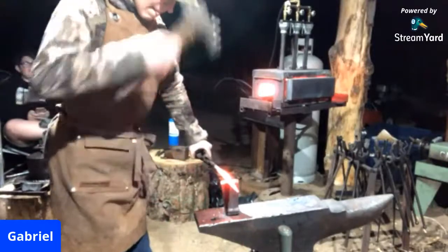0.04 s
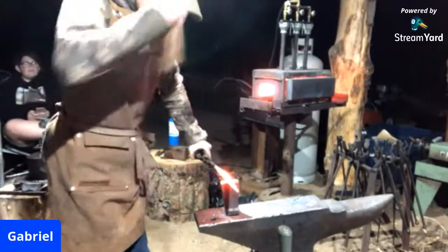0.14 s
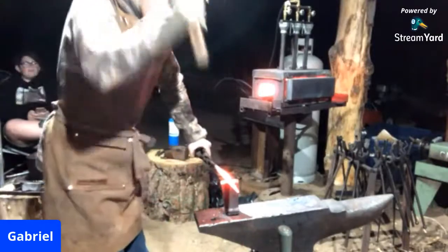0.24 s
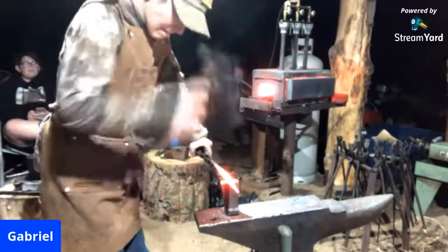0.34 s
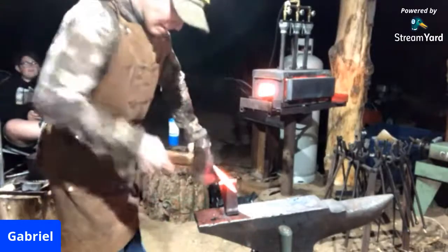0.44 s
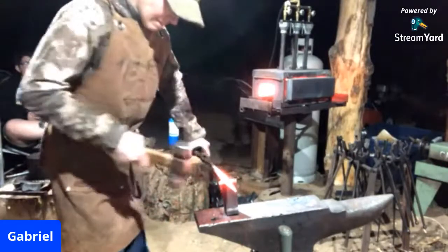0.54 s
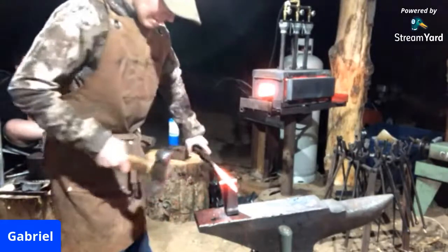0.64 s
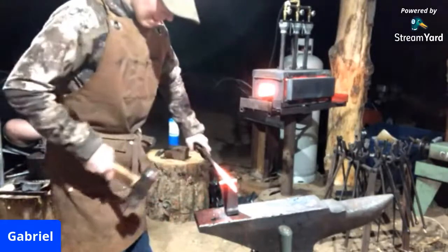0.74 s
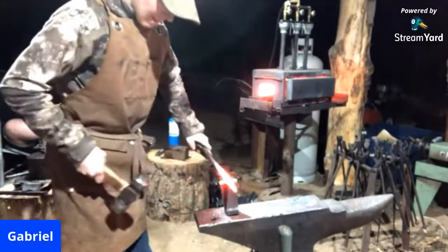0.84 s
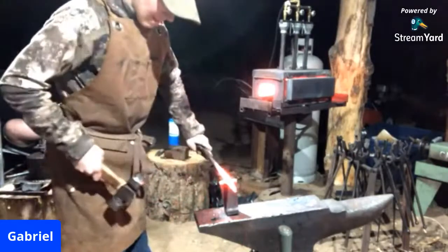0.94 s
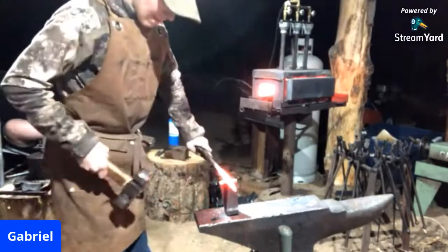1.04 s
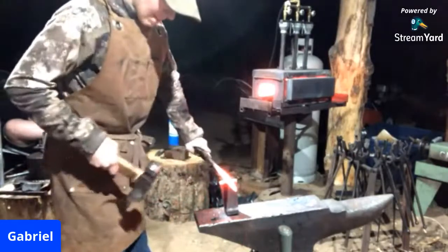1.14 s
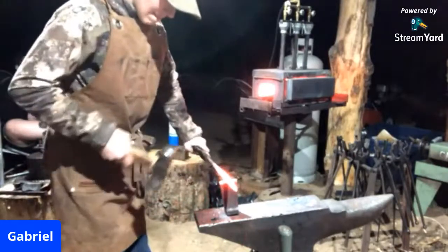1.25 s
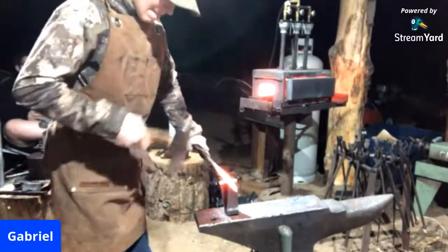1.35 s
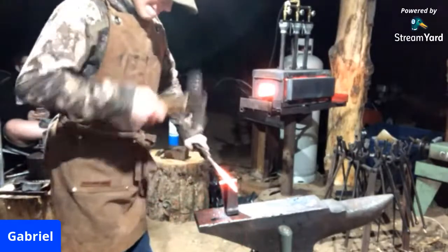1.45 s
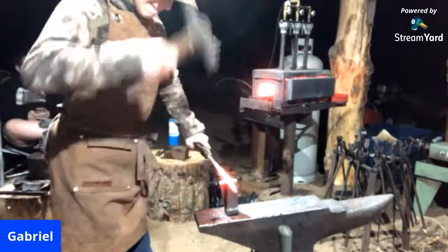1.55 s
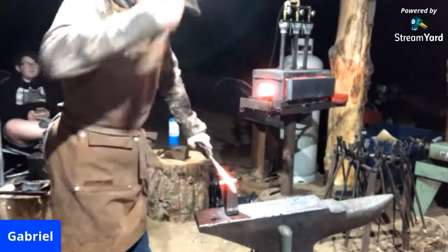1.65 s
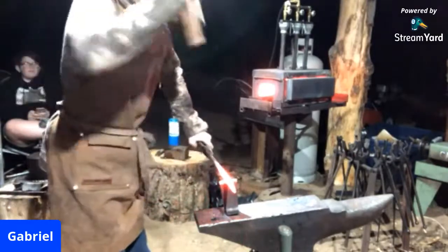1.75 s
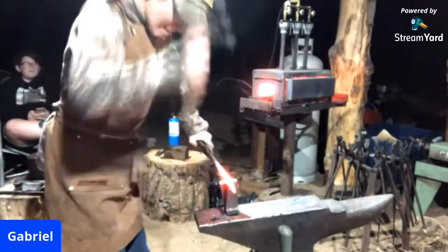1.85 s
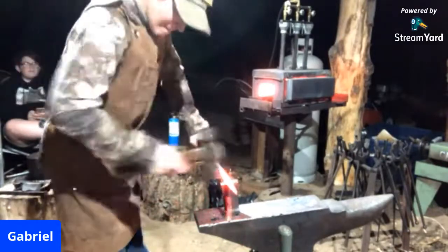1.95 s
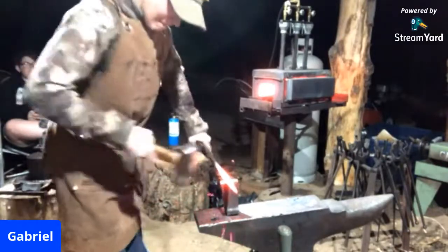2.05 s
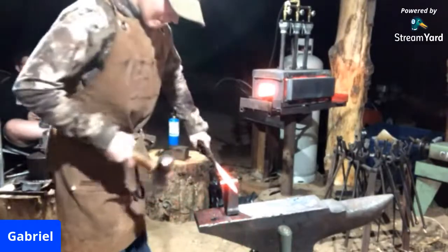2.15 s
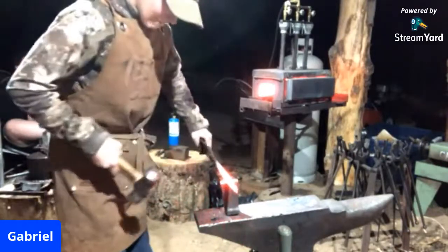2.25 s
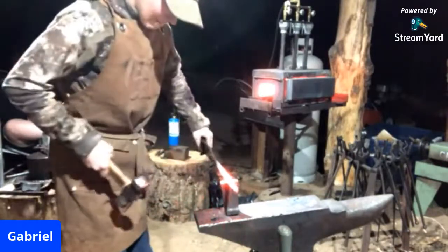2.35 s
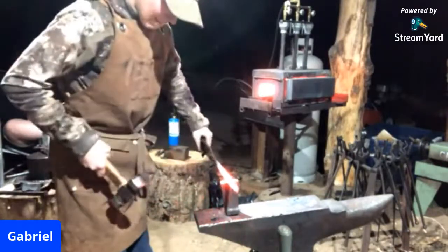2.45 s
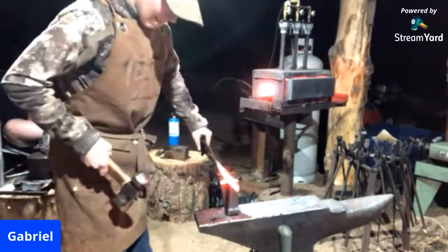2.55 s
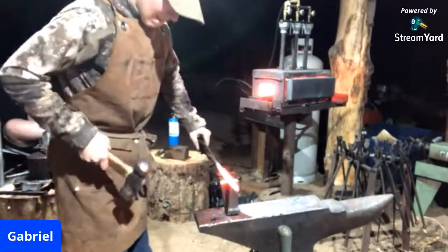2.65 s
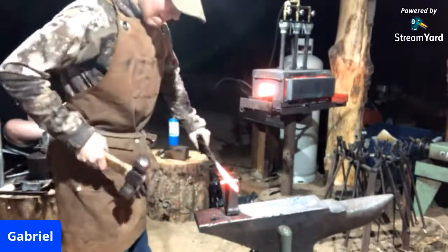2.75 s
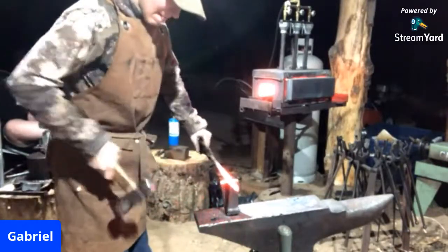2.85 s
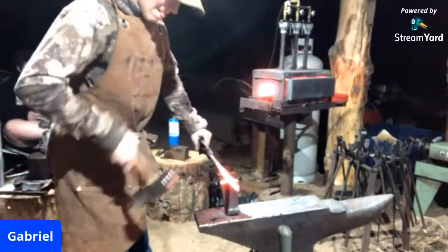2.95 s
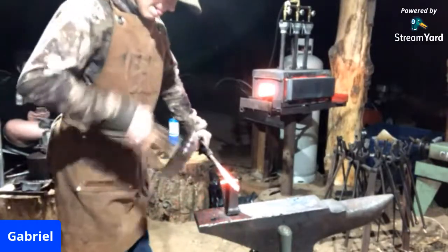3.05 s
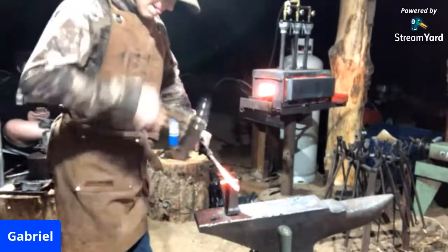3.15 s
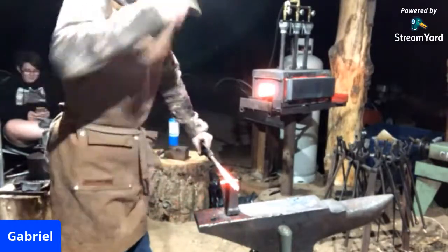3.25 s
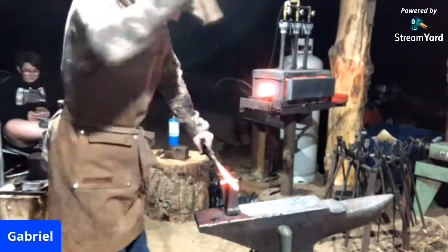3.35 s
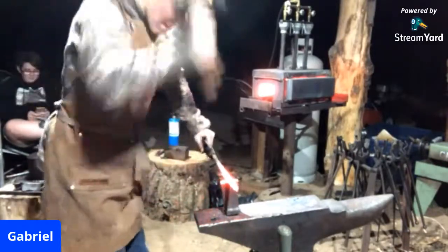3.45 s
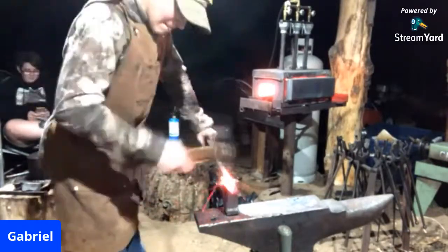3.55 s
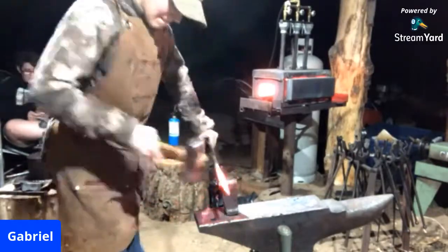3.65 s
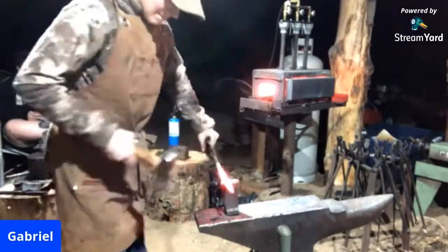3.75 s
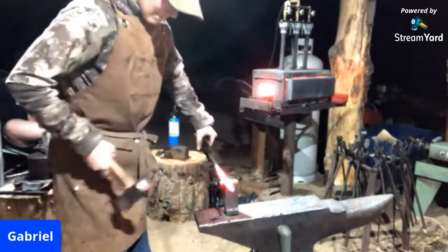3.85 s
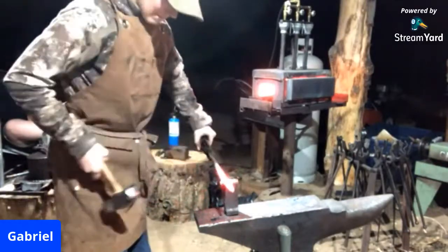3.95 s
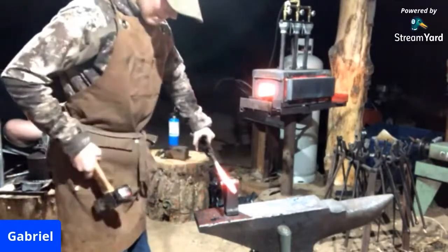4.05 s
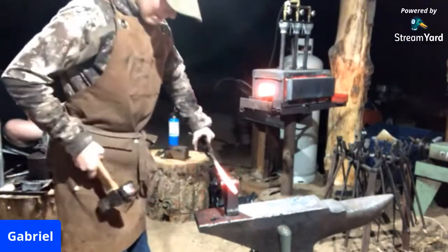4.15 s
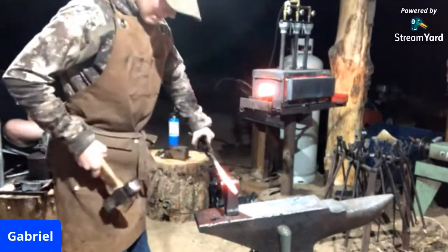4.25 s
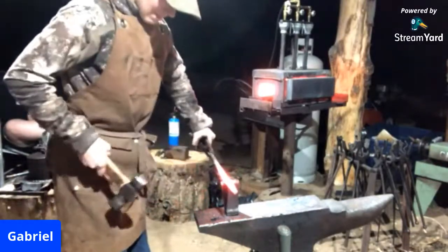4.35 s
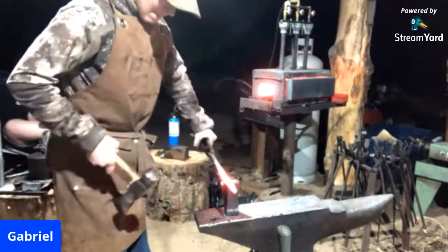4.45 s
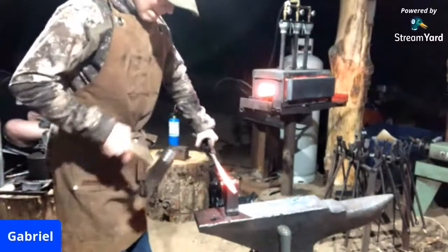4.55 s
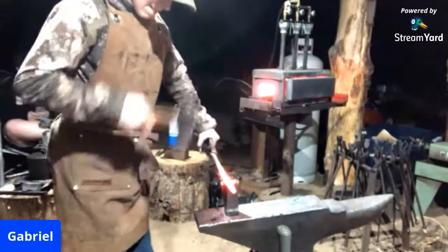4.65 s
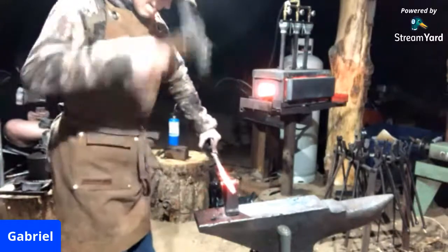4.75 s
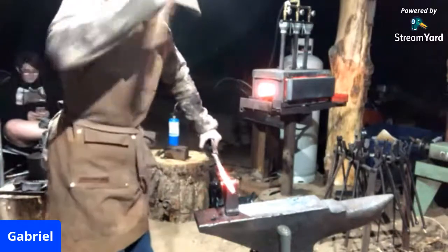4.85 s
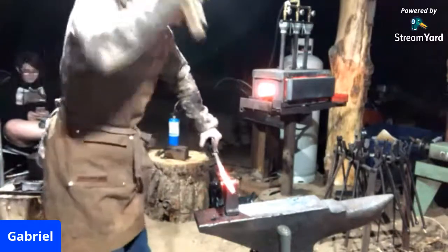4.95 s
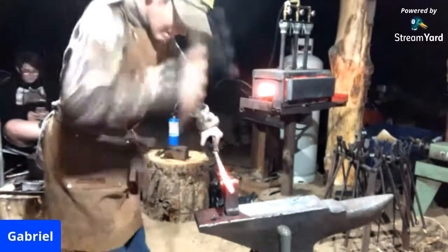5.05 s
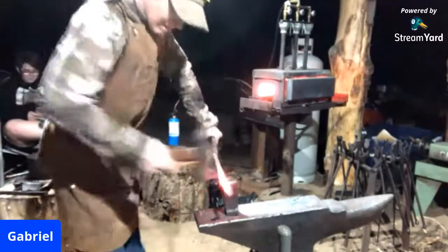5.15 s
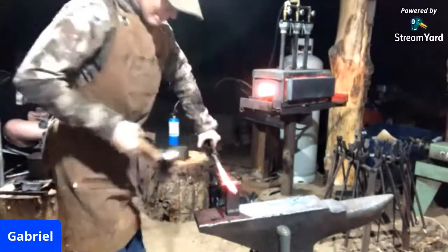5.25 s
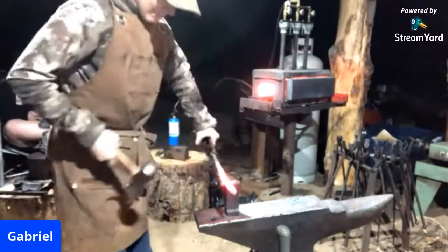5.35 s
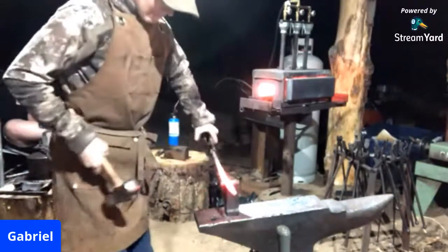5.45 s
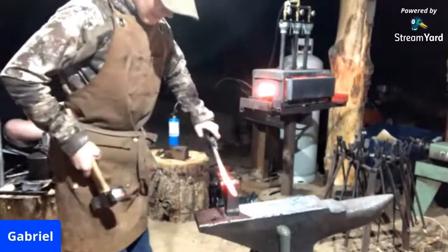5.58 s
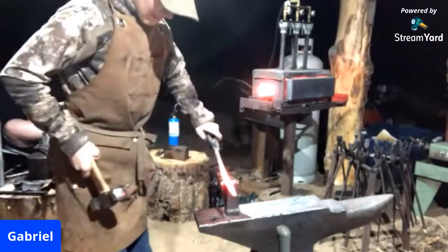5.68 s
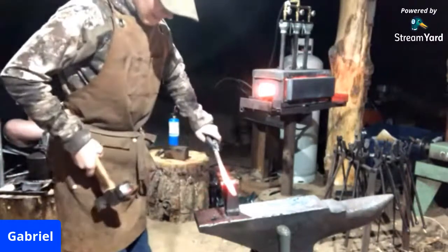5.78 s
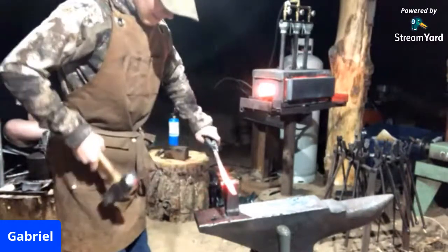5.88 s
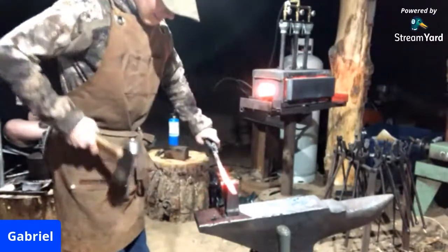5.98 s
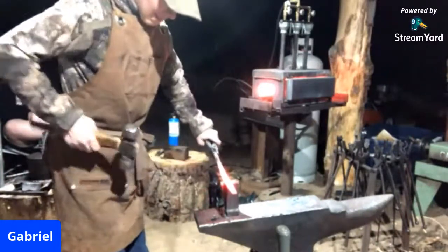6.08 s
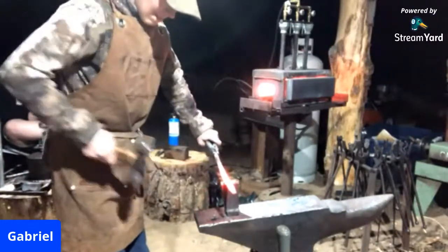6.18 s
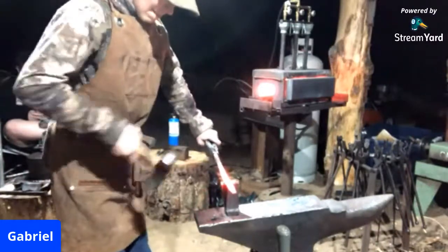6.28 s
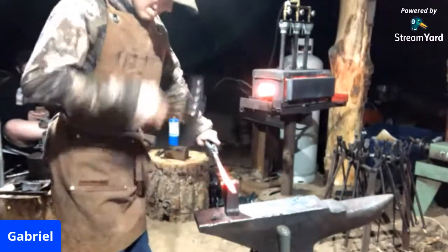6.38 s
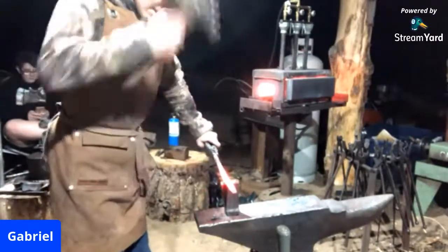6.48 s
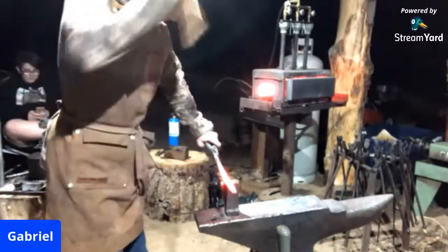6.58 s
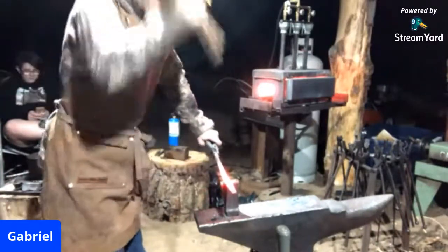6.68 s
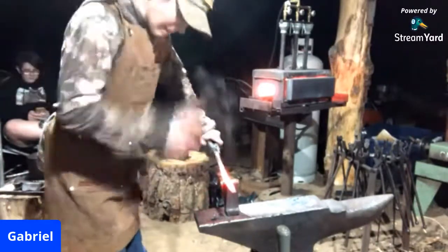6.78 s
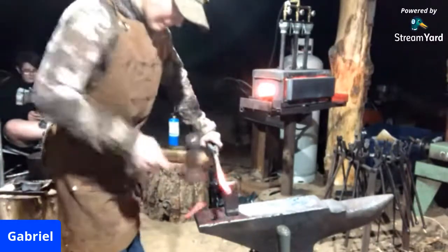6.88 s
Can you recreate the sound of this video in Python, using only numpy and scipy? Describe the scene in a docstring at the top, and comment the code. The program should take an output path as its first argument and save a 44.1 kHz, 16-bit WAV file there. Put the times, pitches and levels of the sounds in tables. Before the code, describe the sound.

In a shed, a gas forge gives a low, hollow roar while a nearby hammer lands five steady, heavy blows on steel held on an anvil. Each hit knocks, clatters off the walls and rings briefly, the last two ringing more brightly. It is heard through a call microphone, so the tails die abruptly, the roar dulls after each hit, and midway the sound briefly buzzes and drops out.

```python
"""Hammering at the forge

In a shed, the microphone hears a hand hammer upset glowing steel on an anvil beside a roaring gas forge.
Each blow thuds through anvil and stump, rings the steel and scatters a bright clatter off the shed.
It all comes over a streamed call: tails are cut short, the roar's treble ducks after each blow,
and the stream stalls once."""
import sys
import numpy as np
from scipy import signal
from scipy.fft import rfft, irfft
from scipy.io import wavfile
from scipy.ndimage import uniform_filter1d

SR = 44100
rng = np.random.default_rng(int(sys.argv[2]) if len(sys.argv) > 2 else 0)


def put_to_file(sound):
    """Save the sound as 16-bit audio at rate SR, in the file named by the first command-line argument."""
    columns = np.atleast_2d(sound).T  # one column per channel
    safe = np.clip(columns, -1, 1)
    whole_steps = np.round(safe * 32767)
    wavfile.write(sys.argv[1], SR, whole_steps.astype(np.int16))


N = 305172

# spectrum of the gas flame: f/Hz, relative level/dB
FLAME_SPECTRUM = [(20, -26), (60, -20), (105, -21.5), (145, -8), (300, -7), (480, -8.5), (650, -14.5),
                  (800, -17.5), (1200, -21), (2200, -37), (3100, -41), (5000, -42.5), (9500, -48),
                  (12000, -54), (16000, -49.5)]
# hollow tones of the forge chamber: f/Hz, width/Hz, boost/dB
CHAMBER_TONES = [(156, 25, 5.4), (214.6, 10, 10), (297, 53, 8.6), (431, 27, 11), (544, 98, 5.4),
                 (676, 69, 3.6), (2130, 220, 6.6), (3820, 460, 4.2), (8800, 650, 2.6)]
# how deep the roar ducks after a blow: f/Hz, gain/dB
ROAR_DUCK = [(300, -0.5), (800, -4.5), (1700, -6), (3300, -6), (8000, -5)]
# a faint tick: t/s, gain/dB
FAINT_TICK = [(6.712, -58)]
# clatter and its reflections off the shed, by band: f/Hz, level before the tilt/dB, t60/s
CLATTER_BANDS = [(150, -20, 0.22), (304, -12.5, 0.088), (550, -10.5, 0.12), (900, -10, 0.17),
                 (1420, -18, 0.18), (2216, -15.5, 0.21), (2980, -17.5, 0.16), (4020, -11.5, 0.18),
                 (6460, -7.5, .15), (8500, -8, .14), (11400, -10.5, .13), (13900, -11, .13),
                 (16200, -11, .1)]
# steel modes of the anvil, the bar with its tongs, and the hammer head: f/Hz, relative level/dB, t60/s
ANVIL_MODES = [(1744, 0.5, .4), (4150, -9.5, 0.23), (5270, -7, 0.11), (6300, -7, .12), (8300, -8.5, 0.15),
               (10000, -12, 0.11), (9930, -7, 0.11), (10042, -9.5, 0.14)]
BAR_MODES = [(2453, 3, 0.22), (2500, -3.5, .16), (5400, -5.5, 0.13), (5910, -7.5, 0.17), (6130, -7.5, 0.26),
             (7900, -7.5, 0.069), (9400, -9.5, .11), (9740, -9.5, 0.099)]
HEAD_MODES = [(3647, -2, .16), (4950, -17.5, 0.35)]
# first knock of the hammer face: f/Hz, relative level/dB, t60/s
FACE_KNOCK = [(858, 2, 0.032), (3610, 2, .012), (6080, -2, .012)]
# the anvil rocking on its stump: f/Hz, relative level/dB, t60/s
STUMP_MODES = [(176.4, -7.5, .2), (248.6, -12, 0.14), (287.3, -4, 0.21), (346, -7.5, 0.3),
               (413, -10, 0.088), (445, -5, 0.18), (467, -12.5, 0.32), (505.5, -8.5, 0.2), (563, -16, 0.28),
               (606.2, 0.5, .12), (679, -13, 0.17), (751, -7, 0.2), (898, -11, 0.14), (973, -10.5, 0.17),
               (963, -8, 0.2), (1090, -16.5, 0.22), (1157, -20.5, .2)]
# each stump mode starts toward (+1) or away from (-1) the microphone
STUMP_SIGNS = [1, 1, 1, 1, -1, -1, -1, -1, 1, 1, -1, -1, -1, 1, 1, 1, -1]
# hammer blows: t/s, gain/dB, trims of clatter/dB, anvil/dB, bar/dB and head/dB, tail held/s
HAMMER_BLOWS = [(0.3911, -0.12, -1.43, -6, -1.5, -3.5, 0.076), (1.9302, -1, -1.2, -2.5, -8, 2, 0.073),
                (3.7608, -0.5, -2, -4.5, -6.5, 1, 0.079), (5.207, -2, 0.84, 5.5, 7.5, -7, 0.078),
                (6.839, -1.68, -1.4, 4.5, -5.5, -11.5, 0.083)]


def undb(db):
    return 10 ** (np.asarray(db) / 20)


def add(out, start_s, x):
    """Mix x into out from start_s."""
    i = int(start_s * SR)
    out[i:i + len(x)] += x[:len(out) - i]


def ring(modes, t, signs=1):
    """Struck modes ring as a sum of damped sines."""
    hz, db, t60 = np.transpose(modes)[:, :, None]
    amplitude = np.reshape(signs, (-1, 1)) * undb(db - 60 * t / t60)
    return np.sum(amplitude * np.sin(2 * np.pi * hz * t), axis=0)


def bands(x, centres_hz):
    """Overlapping bands, crossfaded on log frequency, that add up to x."""
    log_f = np.log(np.maximum(np.fft.rfftfreq(len(x), 1 / SR), 1))
    spectrum = rfft(x)
    weights = [np.interp(log_f, np.log(centres_hz), row) for row in np.eye(len(centres_hz))]
    return [irfft(spectrum * weight, len(x)) for weight in weights]


def flicker(rate_hz):
    """Random steps, smoothed twice; spread near 1."""
    hold = int(SR / rate_hz)
    steps = np.repeat(rng.standard_normal(N // hold + 1), hold)
    return 1.3 * uniform_filter1d(uniform_filter1d(steps, hold), hold)[:N]


def patchy_noise(size, depth_db=4.5, width_hz=495):
    """Noise whose spectrum has random hills and valleys."""
    f = np.fft.rfftfreq(size, 1 / SR)
    hills = np.interp(f / width_hz, np.arange(100), rng.standard_normal(100))
    return irfft(rfft(rng.standard_normal(size)) * undb(depth_db * hills), size)


def forge_roar(level_db=-50.5, duck_in_s=.1, rise_s=.058):
    """The bed: flame noise coloured by the forge chamber; its bands flicker and duck after each blow."""
    f = np.maximum(np.fft.rfftfreq(N, 1 / SR), 1)
    flame_hz, flame_db = np.transpose(FLAME_SPECTRUM)
    shape_db = np.interp(np.log(f), np.log(flame_hz), flame_db)
    shape_db += sum(db / (1 + (2 * (f - hz) / width) ** 2) for hz, width, db in CHAMBER_TONES)
    roar = irfft(rfft(rng.standard_normal(N)) * undb(shape_db), N)
    roar *= undb(level_db) / roar.std()
    t, out = np.arange(N) / SR, 0
    for band, (hz, depth_db) in zip(bands(roar, np.array(ROAR_DUCK)[:, 0]), ROAR_DUCK):
        back_s = .26 + .035 * np.log2(hz / 1000)  # the treble returns later
        corners_s = [0, duck_in_s, back_s - rise_s, back_s]
        duck = sum(np.interp(t - start_s, corners_s, [0, 1, 1, 0]) for start_s, *_ in HAMMER_BLOWS)
        out += band * undb(depth_db * duck + 1.3 * flicker(rate_hz=14))
    return out


def tick(t, decay_s=.0013):
    """A tiny burst of noise, dull above 3 kHz."""
    noise = np.convolve(rng.standard_normal(len(t)), np.hanning(15))[:len(t)]
    return noise * np.exp(-t / decay_s)


def shed_hiss(t, band_hz=(1100, 4500), t60_s=.17):
    """A faint, ragged hiss that lingers in the shed after the clatter."""
    bandpass = signal.butter(2, band_hz, "band", fs=SR, output="sos")
    hiss = signal.sosfilt(bandpass, patchy_noise(len(t)))
    return hiss / hiss.std() * undb(-39.5 - 60 * t / t60_s)


def shed_clatter(t, tilt_db_per_octave=-2, crack_s=.00043, build_s=.002):
    """A sharp crack, then reflections off the shed build up and die away band by band."""
    hz, levels_db, t60s = np.transpose(CLATTER_BANDS)
    levels_db = levels_db + tilt_db_per_octave * np.log2(hz / 2000)
    noise = bands(patchy_noise(len(t)), hz)
    clatter = sum(band / band.std() * undb(db - 60 * t / t60)
                  for band, db, t60 in zip(noise, levels_db, t60s))
    crack = undb(-1.5) * np.exp(1 - t / crack_s) * t / crack_s
    return clatter * (1 - np.exp(-t / build_s) + crack)


def steel_ring(modes, t, swell_s=.0036, rattle_db=3.5, rattle_hz=90):
    """Steel modes build up in a new balance at each blow and waver as the tongs rattle."""
    out = 0
    for hz, db, t60 in modes:
        waver_db = rattle_db * np.interp(t * rattle_hz, np.arange(50), rng.standard_normal(50))
        struck_db = db + hz / 3500 * rng.standard_normal()  # high modes vary most
        out += undb(waver_db) * ring([(hz, struck_db, t60)], t)
    return out * (1 - .88 * np.exp(-t / swell_s))


def stump_thud(t, contact_s=.0008, rebound_s=.001):
    """The hammer knocks and pushes into soft steel; the anvil dips and the stump throws it back."""
    push = np.sin(np.pi * np.clip(t / contact_s, 0, 1))[:200]
    rocking = np.convolve(ring(STUMP_MODES, t, STUMP_SIGNS), push / push.sum())[:len(t)]
    rebound = np.interp(t - rebound_s, t, rocking, left=0)
    return rebound - undb(-4) * rocking + ring(FACE_KNOCK, t)


def hammer_blow(t, clatter_db, anvil_db, bar_db, head_db, hold_s):
    """Thud, steel and clatter through the microphone's bass cut; the hiss outlasts the shortened tail."""
    bass_cut_hz, leak_db = 138, -24
    cut_db, cut_s, sink_db_per_s = -19.5, .041, -64
    clatter = undb(clatter_db) * shed_clatter(t)
    steel = undb(anvil_db) * steel_ring(ANVIL_MODES, t)
    steel += undb(bar_db) * steel_ring(BAR_MODES, t)
    steel += undb(head_db) * steel_ring(HEAD_MODES, t)
    at_mic = undb(-16) * stump_thud(t) + undb(-29) * steel + undb(-12.5) * clatter
    bass_cut = signal.butter(4, bass_cut_hz, "high", fs=SR, output="sos")
    picked_up = signal.sosfilt(bass_cut, at_mic) + undb(leak_db) * at_mic
    late_s = np.maximum(t - hold_s, 0)
    tail_db = cut_db * np.minimum(late_s / cut_s, 1) + sink_db_per_s * late_s
    return picked_up * undb(tail_db) + undb(clatter_db) * shed_hiss(t)


def scene():
    """One microphone in the shed: the forge behind, five blows up front, one faint tick."""
    out, t = forge_roar(), np.arange(SR // 2) / SR
    for start_s, gain_db, *colour in HAMMER_BLOWS:
        add(out, start_s, undb(gain_db) * hammer_blow(t, *colour))
    for start_s, gain_db in FAINT_TICK:
        add(out, start_s, undb(gain_db) * tick(t))
    return out[None]


def stream_stall(x, stall_s=3.126, fade_s=3.2, mute_s=3.29, resume_s=3.355):
    """The player loops the lows of its last cycle, fades into noise and silence, then resumes."""
    cycle_s, splice_s = .0066, .003
    drop_db, drop_s, fade_db_per_s = -9, .025, -380
    a, b, n = int(stall_s * SR), int(resume_s * SR), int(cycle_s * SR)
    t = np.arange(a, b) / SR
    low, high = bands(x, [1500, 2200])
    ramp = np.linspace(0, 1, n)
    cycle = low[a - n:a] * (1 - ramp) + low[a - 2 * n:a - n] * ramp  # seamless loop
    loop = np.resize(cycle / cycle.std() * low[a - 20 * n:a].std(), b - a)
    purity = np.interp(t, [fade_s - .02, fade_s], [.92, .34])
    buzz = purity * loop + np.sqrt(1 - purity ** 2) * low[a:b] + high[a:b]
    late_s = np.maximum(t - fade_s, 0)
    buzz_db = -2.5 + drop_db * np.minimum(late_s / drop_s, 1) + fade_db_per_s * late_s
    buzz *= undb(buzz_db) * (t < mute_s)
    live = np.interp(t, [stall_s, stall_s + splice_s, resume_s - splice_s, resume_s], [1, 0, 0, 1])
    return np.concatenate([x[:a], live * x[a:b] + (1 - live) * buzz, x[b:]])


def record(dry):
    """The call rounds the peaks, steps the treble down, stalls once and cuts off the very top."""
    headroom, edge_hz, step_db, top_hz = 1.1, 11630, -19, 16000
    rounded = headroom * np.tanh(dry[0] / headroom)
    above_edge = (1 + np.tanh((np.fft.rfftfreq(N, 1 / SR) - edge_hz) / 250)) / 2
    dulled = irfft(rfft(rounded) * undb(step_db * above_edge), N)
    lowpass = signal.ellip(10, .2, 70, top_hz, fs=SR, output="sos")
    return signal.sosfilt(lowpass, stream_stall(dulled))[None]


dry = scene()
out = record(dry)
put_to_file(out)
```